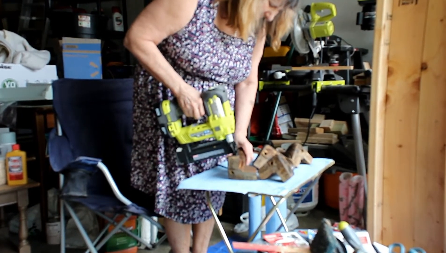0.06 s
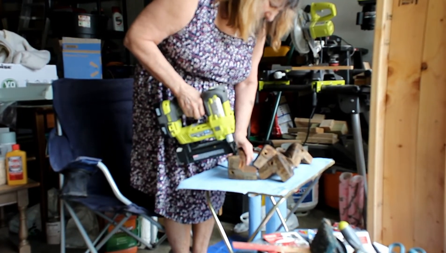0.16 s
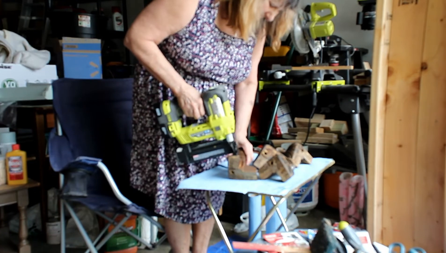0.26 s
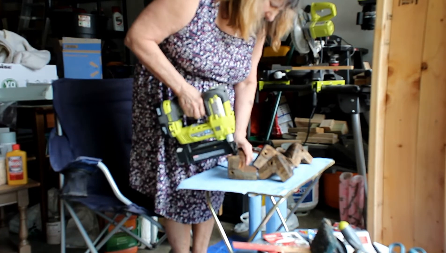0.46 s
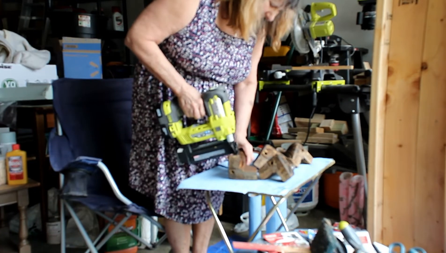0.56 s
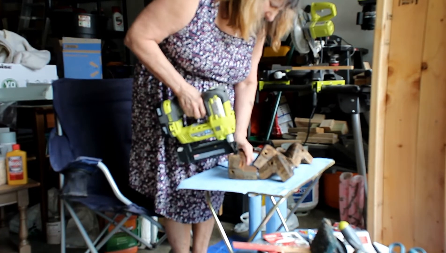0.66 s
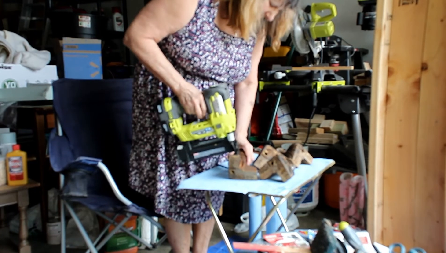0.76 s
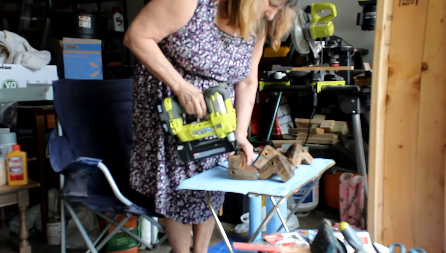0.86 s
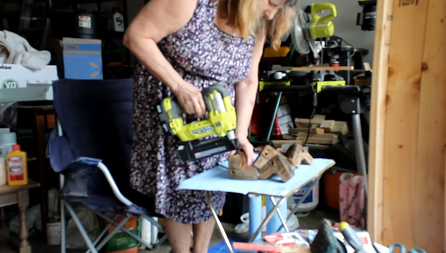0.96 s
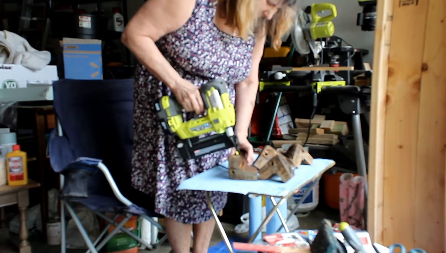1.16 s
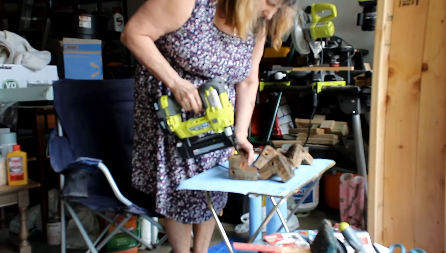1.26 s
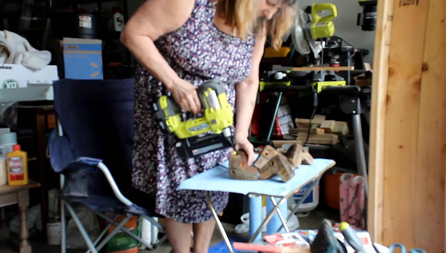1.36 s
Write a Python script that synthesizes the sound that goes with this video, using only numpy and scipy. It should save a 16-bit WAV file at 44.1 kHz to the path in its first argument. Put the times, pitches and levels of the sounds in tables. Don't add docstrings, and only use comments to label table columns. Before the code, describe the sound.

Single nail gun shot into wood: short motor whine, sharp bang, metallic snap, brief room tail

```python
import sys
import numpy as np
from scipy import signal
from scipy.io import wavfile
from scipy.ndimage import uniform_filter1d

SR = 44100
rng = np.random.default_rng(int(sys.argv[2]) if len(sys.argv) > 2 else 0)


def boost_factor(decibels):
    exponent = np.asarray(decibels, float) / 20
    return 10 ** exponent


def store_wav(level_fs):
    pcm = np.round(np.clip(np.atleast_2d(level_fs), -1, 1) * 32767)
    wavfile.write(sys.argv[1], SR, pcm.T.astype(np.int16))


N = 61739
T = np.arange(N) / SR


def rms_one(x):
    return x / np.sqrt(np.mean(x ** 2) + 1e-20)


def noise():
    return rng.standard_normal((2, N))


def in_time(rows):
    return np.interp(T, *np.transpose(rows))


def at_hz(points, hz):
    table_hz, value = np.transpose(points)
    return np.interp(np.log(hz), np.log(table_hz), value)


def butter(x, order, hz, kind="low"):
    return signal.sosfilt(signal.butter(order, hz, kind, fs=SR, output="sos"), x)


def bands(x):
    edges = 25 * 2 ** np.arange(0, 9.6, .5)
    out = []
    for k, (low, high) in enumerate(zip(edges, edges[1:])):
        out.append((np.sqrt(low * high), butter(x[k % 2], 2, [low, high], "band")))
    return out


def colour(x, spectrum):
    return rms_one(sum(boost_factor(at_hz(spectrum, hz)) * b for hz, b in bands(x)))


def resonance(x, hz, width_hz):
    r = np.exp(-np.pi * width_hz / SR)
    poles = [1, -2 * r * np.cos(2 * np.pi * hz / SR), r * r]
    return signal.lfilter([(1 - r * r) / 2, 0, (r * r - 1) / 2], poles, x)


def noise_band(hz, width_hz):
    return rms_one(resonance(resonance(rng.standard_normal(N), hz, width_hz), hz, width_hz))


def ring(clicks, hz, t60_s):
    r, w = boost_factor(-60 / (t60_s * SR)), 2 * np.pi * hz / SR
    return signal.lfilter([0, np.sin(w)], [1, -2 * r * np.cos(w), r * r], clicks + 1e-18)


def swell(s, length_s):
    return np.exp(-.5 * (2 * (T - s) / length_s) ** 2)


def squeal(s, length_s, hz, glide_hz_per_s, db):
    blur, rough = .07, .9
    slow = butter(noise(), 2, blur * hz / 2)
    phase = 2 * np.pi * (hz * T + .5 * glide_hz_per_s * (T - s) ** 2)
    in_phase = (1 + rough * rms_one(slow[0])) * np.sin(phase)
    quadrature = rough * rms_one(slow[1]) * np.cos(phase)
    return boost_factor(db) * swell(s, length_s) * rms_one(in_phase + quadrature)


# (frequency [Hz], density [dB per Hz])
OUTDOOR_SPECTRUM = [(25, -8.5), (90, 5), (200, -3), (500, -6), (900, -6), (5500, -20.5), (8500, -24),
                    (12000, -43)]
# (frequency [Hz], width [Hz], level [dB])
INSECT_CHORUS = [(7500, 1200, -57.5), (8480, 1400, -60)]
# (time [s], length [s], level [dB])
CRICKET_CHIRPS = [
    (.02, .05, -6),
    (0.175, 0.026, 19),
    (0.72, 0.02, 7),
    (0.803, .12, -5.5),
    (1.166, .025, 5.5),
    (1.34, .02, 9),
]
# (time [s], length [s], frequency [Hz], glide [Hz per s], level [dB])
ENGINE_SWELLS = [
    (0.91, 0.15, 180, 0.5, -55.5),
    (0.96, 0.087, 170, 0.5, -64),
    (1.11, .08, 170, 0.5, -58),
    (0.29, .05, 130, 0.5, -55),
]
AIR_DB, CRICKET_HZ, CRICKET_DB = -48.5, 10850, -70
LULL_S, LULL_SPAN_S, LULL_SHARE, LULL_HZ = .68, .25, 0.77, 150


def outdoors():
    air = boost_factor(AIR_DB) * colour(noise(), OUTDOOR_SPECTRUM)
    rumble = signal.filtfilt(*signal.butter(2, LULL_HZ, fs=SR), air)
    air = air - LULL_SHARE * swell(LULL_S, LULL_SPAN_S) * rumble
    chorus = sum(boost_factor(db) * noise_band(hz, width_hz) for hz, width_hz, db in INSECT_CHORUS)
    engine = sum(squeal(*row) for row in ENGINE_SWELLS)
    chirps = sum(boost_factor(db) * swell(s, length_s) for s, length_s, db in CRICKET_CHIRPS)
    return air + engine + chorus + boost_factor(CRICKET_DB) * chirps * noise_band(CRICKET_HZ, 100)


# (time [s], level [dB])
MOTOR_EFFORT = [(.155, -73.5), (.168, -38), (.18, -23.5), (.2, -21.5), (.27, -15), (.3, -15.5), (.36, -16),
                (.4, -17.5), (.415, -40)]
# (time [s], speed [turns per s])
SHAFT_SPEED = [(.16, 190), (.24, 200), (.27, 207), (.32, 214), (.36, 212), (.4, 250)]
# (multiple of shaft speed [-], level [dB])
SHAFT_TONES = [(1.0, -17.5), (1.55, -15), (2.35, -14), (4.0, -23)]
# (frequency [Hz], density [dB per Hz])
GEAR_SPECTRUM = [(88, -67.5), (150, -42.5), (326, -10.5), (550, -11), (827, -4.5), (2100, -3), (5000, -5),
                 (8300, -6), (15500, -76.5)]
# (time [s], length [s], frequency [Hz], glide [Hz per s], level [dB])
CASING_SQUEALS = [(.2, 0.024, 850, 500.5, -6.5), (.195, .045, 1035, 600, -8), (0.24, .025, 420, -300, -17),
                  (.216, .02, 1120, 2999.5, -10), (.2, .03, 2665, 0, -10.5),
                  (.225, 0.033, 3600, 4000.5, -14), (.225, 0.056, 4780, 501.5, -7.5),
                  (.24, .025, 835, 1499.5, -17), (.277, 0.03, 3870, 5000.5, -6),
                  (.282, 0.038, 1210, -300, -10), (.285, 0.023, 1640, 3000, -9),
                  (.297, 0.039, 3290, 1499.5, -3.5), (.298, .03, 2910, 500.5, -4),
                  (.336, 0.023, 2980, -8000, -0.5), (.33, 0.033, 2665, -500, -5),
                  (.352, 0.012, 3050, -500, -8), (.315, 0.024, 5960, -8000, -4.5),
                  (.35, .03, 5170, -12000, -4), (.378, .028, 4010, -9000, 1),
                  (.34, 0.037, 4400, 4001.5, -7.5), (.26, 0.026, 6800, 3000, -10),
                  (.397, .016, 4600, -15000, -4), (.375, 0.022, 840, 300, -15),
                  (.372, .03, 385, -1500, -15.5), (.385, .025, 1750, -2000, -8),
                  (.245, .02, 1500, -3000, -9.5)]
TEETH_PER_S, TOOTH_SPREAD_DB, ONCE_A_TURN_DB = 5000, 3.0, -0.5
FULL_LOAD_S, LOAD_SPAN_S = .315, 0.07
BRIGHT_HZ, BRIGHT_START_S, BRIGHT_RISE_S = 5060, .17, 0.037
GRIND_DB, MOTOR_STOP_S = -0.5, .43


def motor():
    turn = 2 * np.pi * np.cumsum(in_time(SHAFT_SPEED)) / SR
    tooth_db = TOOTH_SPREAD_DB * np.minimum(rng.exponential(1, (2, N)), 4)
    sizes = boost_factor(tooth_db) * rng.choice([-1, 1], (2, N))
    meets = rng.random((2, N)) < TEETH_PER_S / SR
    teeth = sizes * meets * boost_factor(ONCE_A_TURN_DB * np.cos(turn)) + 1e-18
    grind = colour(teeth, GEAR_SPECTRUM)
    dull = butter(grind, 2, BRIGHT_HZ)
    bright = np.clip((T - BRIGHT_START_S) / BRIGHT_RISE_S, 0, 1)
    grind = boost_factor(GRIND_DB) * (dull + bright * (grind - dull))
    squeals = sum(squeal(*row) for row in CASING_SQUEALS)
    tones = swell(FULL_LOAD_S, LOAD_SPAN_S) * sum(boost_factor(db) * np.sin(k * turn) for k, db in SHAFT_TONES)
    return boost_factor(in_time(MOTOR_EFFORT)) * (T < MOTOR_STOP_S) * (grind + squeals + tones)


# (frequency [Hz], t60 [s])
WALL_T60 = [(100, 0.23), (400, .7), (1700, 0.66), (3300, 0.72), (6000, 0.66), (12000, 0.33)]
WALLS_DB, CLUTTER_DB, CLUTTER_T60_S, FIRST_WALL_S = -8.5, -7.5, 0.15, .004


def garage(x):
    t = np.maximum(T - FIRST_WALL_S, 0)
    walls = sum(b * boost_factor(-60 * t / at_hz(WALL_T60, hz)) for hz, b in bands(noise()))
    clutter = rng.standard_normal(N) * boost_factor(-60 * t / CLUTTER_T60_S)
    tail = boost_factor(WALLS_DB) * rms_one(walls) + boost_factor(CLUTTER_DB) * rms_one(clutter)
    return signal.fftconvolve(x, (T > FIRST_WALL_S) * tail / np.sqrt(N))[:N]


def wash(spectrum, hums, start_s, clutter_db, walls_db, build_up_s=0.0011):
    t = np.maximum(T - start_s, 0)
    two = []
    for _ in range(2):
        hiss = colour(noise(), spectrum)
        housing = sum(boost_factor(db) * noise_band(hz, width_hz) for hz, width_hz, db in hums)
        two.append(hiss + housing)
    out = 0
    for hz, b in bands(two):
        clutter = boost_factor(clutter_db - 60 * t / CLUTTER_T60_S)
        walls = boost_factor(walls_db - 60 * t / at_hz(WALL_T60, hz))
        out = out + b * (clutter + walls)
    return (1 - np.exp(-t / build_up_s)) * out


MODES_DB, STRIKE_SPREAD_DB, CRACK_T60_S, CONTACT_HZ = -14, 2.0, 0.011, 6000


def blow(contacts, modes, crack, crack_db):
    s, db = np.transpose(contacts)
    at, ringing, clicks = (s * SR).astype(int), 0, np.zeros(N)
    for hz, level_db, t60_s in modes:
        strike_db = db + level_db + MODES_DB + rng.normal(0, STRIKE_SPREAD_DB, len(s))
        clicks[at] = boost_factor(strike_db) * rng.choice([-1, 1], len(s))
        ringing = ringing + ring(clicks, hz, t60_s)
    soft = np.exp(-2 * np.pi * CONTACT_HZ / SR)
    ringing = signal.lfilter([1 - soft], [1, -soft], ringing)
    clicks[at] = boost_factor(db + crack_db)
    decay = signal.lfilter([1], [1, -boost_factor(-60 / (CRACK_T60_S * SR))], clicks + 1e-18)
    return ringing + uniform_filter1d(decay, size=15) * colour(noise(), crack)


def struck(s, modes):
    click = 1.0 * (np.arange(N) == int(s * SR))
    return sum(boost_factor(db) * ring(click, hz, t60_s) for hz, db, t60_s in modes)


# (time [s], level [dB])
SHOT_CONTACTS = [
    (.4015, -9),
    (.4035, -12.5),
    (.4050, 7.5),
    (.4065, 8.5),
    (.4076, 3.5),
    (.4112, -5.5),
    (.4127, -2.5),
    (.4142, -9),
    (.418, -13.5),
]
# (frequency [Hz], level [dB], t60 [s])
SHOT_GUN_MODES = [(325, -22, 0.013), (770, -13.5, 0.03), (1600, 2.5, 0.027), (1733, -8, 0.035),
                  (2130, -6, .012), (2600, -5, .012), (3257, 0, 0.017), (3970, 0.5, 0.023),
                  (4700, -1, .012), (6530, -3, 0.037), (7970, -4, 0.011)]
# (frequency [Hz], density [dB per Hz])
SHOT_CRACK_SPECTRUM = [(24, -40.5), (40, -18.5), (360, -7), (776, -15), (1670, -3), (3510, -10), (5550, -7),
                       (7500, -4.5), (16000, -46)]
# (frequency [Hz], density [dB per Hz])
SHOT_WASH_SPECTRUM = [(59, -42.5), (100, -11.5), (391, -7), (416, -1.5), (797, -13.5), (1050, -1),
                      (3530, -10.5), (6220, -8.5), (15000, -50.5)]
# (frequency [Hz], width [Hz], level [dB])
SHOT_HOUSING = [(1160, 120, -15.5), (336, 240, -18.5), (6300, 730, -7.5)]
# (start [s], clutter level [dB], walls level [dB])
SHOT_ROOM = (.412, -15, -14)
# (frequency [Hz], level [dB], t60 [s])
TABLE_THUMP = [(106, -17.5, 0.06), (171, -22.5, 0.2)]
# (frequency [Hz], level [dB], t60 [s])
WOOD_MODES = [(430, -10, 0.064), (627, -21, .04), (967, -12, .04), (1222, -5.5, 0.073), (1148, -22, .2)]


def shot():
    gun = blow(SHOT_CONTACTS, SHOT_GUN_MODES, SHOT_CRACK_SPECTRUM, crack_db=-4)
    room = wash(SHOT_WASH_SPECTRUM, SHOT_HOUSING, *SHOT_ROOM)
    table = struck(SHOT_CONTACTS[0][0], TABLE_THUMP)
    wood = struck(SHOT_CONTACTS[2][0], WOOD_MODES)
    return butter(gun + room + table + wood, 2, 65, "high")


# (time [s], level [dB])
SNAP_CONTACTS = [(.5285, -9), (.5292, 6), (.5299, 2.5), (.5307, 7), (.5322, -5.5), (.5344, 7.5), (.5355, 3),
                 (.5375, -13), (.539, -1), (.5412, -9), (.5445, -12.5), (.549, -7), (.5525, -6)]
# (frequency [Hz], level [dB], t60 [s])
SNAP_GUN_MODES = [(224.2, -17.5, 0.055), (908, -21, 0.026), (1490, -3.5, 0.02), (1770, 4.5, 0.02),
                  (2600, -5, 0.0078), (2900, 2, 0.008), (3360, 10, 0.0094), (3620, 6, 0.0049),
                  (4300, -10, 0.0074), (5200, 1, 0.006), (6400, 3, 0.008), (7800, 2.5, 0.0048),
                  (9850, 3.5, 0.0028)]
# (frequency [Hz], density [dB per Hz])
SNAP_CRACK_SPECTRUM = [(100, -56), (200, -34), (400, -16), (1070, -28.5), (1700, 4), (3270, 0), (9000, -13),
                       (15500, -55)]
# (frequency [Hz], density [dB per Hz])
SNAP_WASH_SPECTRUM = [(88, -52), (150, -28), (294, -15), (416, -8.5), (772, -18.5), (1800, -6.5),
                      (3340, -7.5), (7790, -13.5), (15000, -66)]
# (frequency [Hz], width [Hz], level [dB])
SNAP_HOUSING = [(413, 54, -18.5), (1601, 144, -5), (1800, 190, -5), (3140, 740, -4.5), (3414, 410, -6.5)]
# (start [s], clutter level [dB], walls level [dB])
SNAP_ROOM = (.536, -11.5, -19)
# (frequency [Hz], level [dB], t60 [s])
TABLE_MODES = [(413, -9, 0.075), (408, -27, 0.53), (447, -20.5, 0.1)]


def snap():
    gun = blow(SNAP_CONTACTS, SNAP_GUN_MODES, SNAP_CRACK_SPECTRUM, crack_db=-9)
    room = wash(SNAP_WASH_SPECTRUM, SNAP_HOUSING, *SNAP_ROOM)
    table = struck(SNAP_CONTACTS[1][0], TABLE_MODES)
    return butter(gun + room + table, 4, 170, "high")


# (time [s], level [dB], frequency [Hz])
SETTLING_TICKS = [
    (0.699, -50, 11900),
    (0.697, -34, 7200),
    (.793, -54.5, 8260),
    (1.2463, -47.5, 8100),
]


def settling_ticks():
    return sum(boost_factor(db) * swell(s, 0.0039) * noise_band(hz, 1500) for s, db, hz in SETTLING_TICKS)


# (time [s], length [s], frequency [Hz], glide [Hz per s], level [dB])
HOUSING_BUZZ = [
    (.71, .05, 3300, 500, -40),
    (.7, .04, 3400, 0.5, -43),
]


def housing_buzz():
    return sum(squeal(*row) for row in HOUSING_BUZZ)


def scene():
    gears = motor()
    blows = shot() + snap()
    return (gears + garage(gears) + blows + settling_ticks() + outdoors() + housing_buzz())[None]


# (time [s], level [dB])
RECORDER_GAIN = [(0, -1.5), (.3, -2), (.41, -2.5), (.45, -10), (.6, -14), (.78, -9.5), (.81, -7), (.87, -7),
                 (.93, -8.5), (1.1, -8), (1.4, -2.5)]
MIC_CUT_HZ, STOP_BAND_HZ, RUMBLE_CUT_HZ, OVERLOAD = 14500, 16500, 50, 1.0


def low_pass(x):
    return signal.sosfilt(signal.butter(12, 20000, fs=SR, output="sos"), x)


# (time [s], level [dB])
RECORDER_GAIN = [(0, -1.5), (.3, -2), (.41, -2.5), (.45, -10), (.6, -14), (.78, -9.5), (.81, -7), (.87, -7),
                 (.93, -8.5), (1.1, -8), (1.4, -2.5)]
MIC_CUT_HZ, STOP_BAND_HZ, RUMBLE_CUT_HZ, OVERLOAD = 14500, 16500, 50, 1.0


def record(dry):
    mic = butter(dry, 4, MIC_CUT_HZ)
    mic = signal.sosfilt(signal.cheby2(8, 50, STOP_BAND_HZ, fs=SR, output="sos"), mic)
    hot = np.clip(mic * boost_factor(in_time(RECORDER_GAIN)), -OVERLOAD, OVERLOAD)
    hot = butter(hot, 2, RUMBLE_CUT_HZ, "high")
    mix = signal.lfilter([.6, .4], [1], hot)
    return low_pass(mix)


dry = scene()
out = record(dry)
store_wav(out)
```